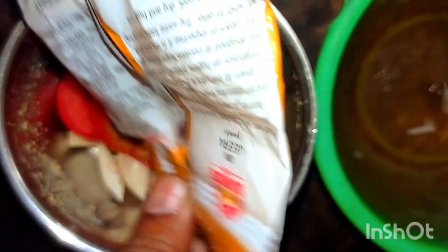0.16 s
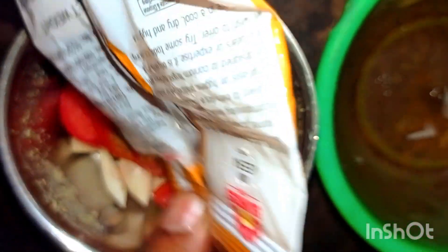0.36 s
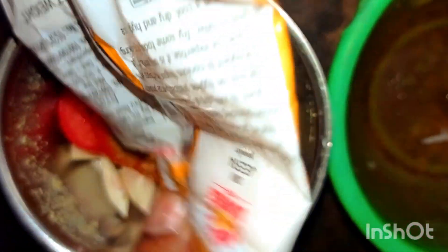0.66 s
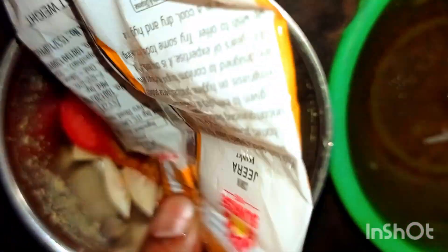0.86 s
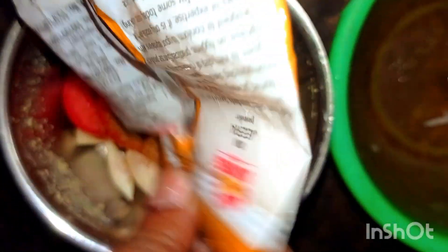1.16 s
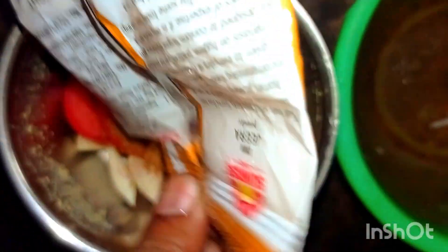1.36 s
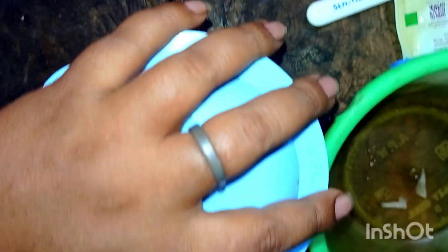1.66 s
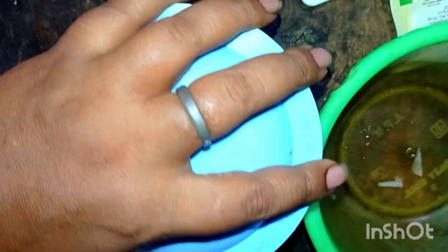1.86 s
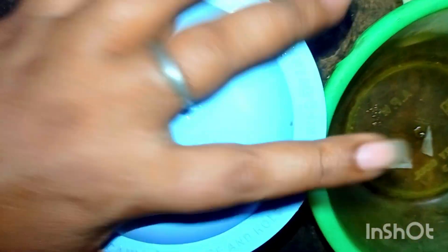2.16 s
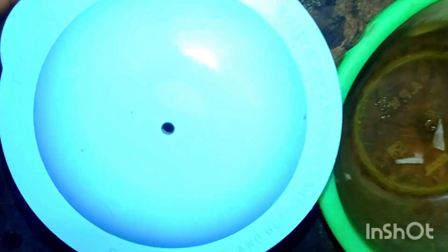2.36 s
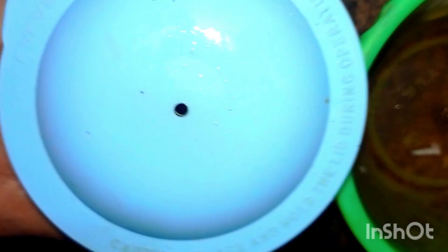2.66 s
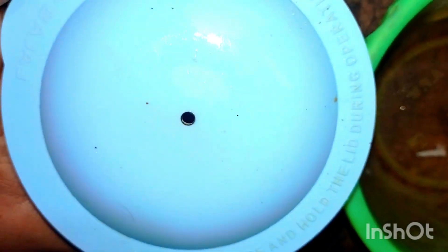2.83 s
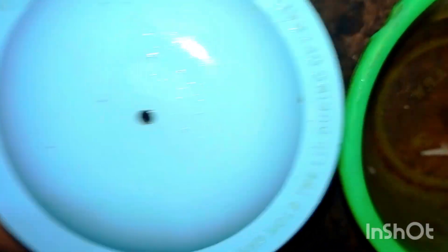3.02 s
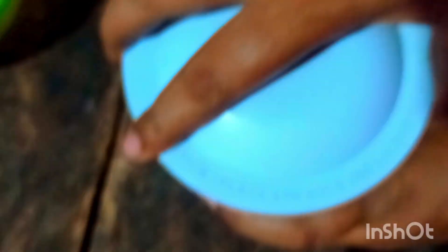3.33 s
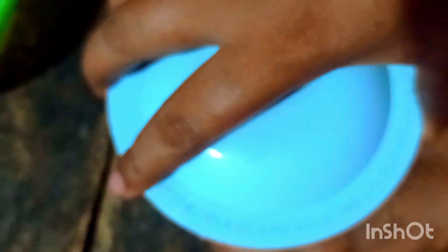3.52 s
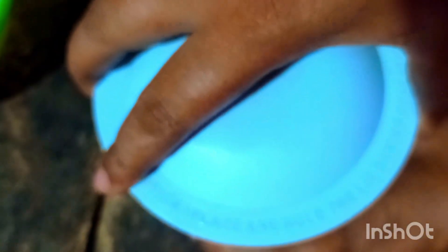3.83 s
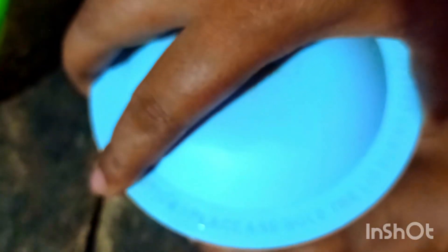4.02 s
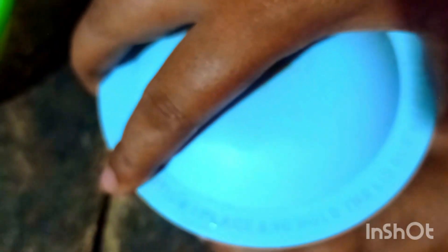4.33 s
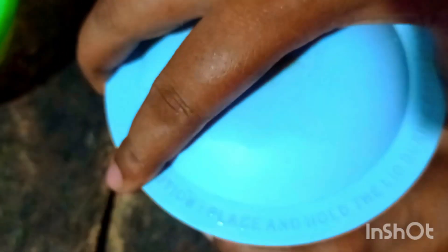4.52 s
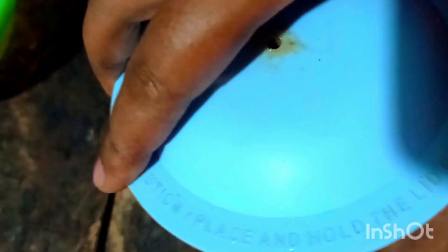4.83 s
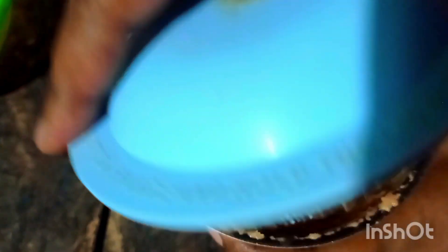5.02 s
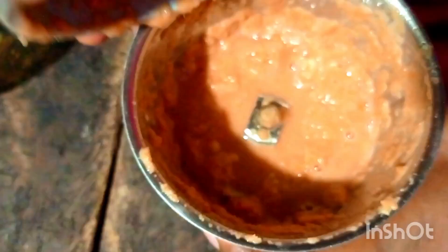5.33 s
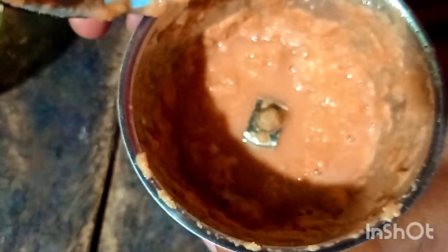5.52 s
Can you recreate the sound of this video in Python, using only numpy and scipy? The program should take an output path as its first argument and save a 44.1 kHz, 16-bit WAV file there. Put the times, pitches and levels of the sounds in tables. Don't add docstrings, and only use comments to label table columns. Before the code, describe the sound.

Close phone pickup of hands at a wooden kitchen table: bright, dry packet crackles come first, dense and uneven. Next, a palm brushes and twists a plastic lid on a metal jar, ending in dull hollow thuds and a thin rising squeak. After a short muted gap, quieter scuffs, faint seal chirps and a rattly knock follow as the lid comes off. Water-like hiss continues throughout except in the gap, slightly softer afterward.

```python
import sys
import numpy as np
from scipy import signal
from scipy.io import wavfile
from scipy.ndimage import uniform_filter1d

SR = 44100
rng = np.random.default_rng(int(sys.argv[2]) if len(sys.argv) > 2 else 0)


def nominal_scale(level):
    x = np.asarray(level, float) / 20
    return 10 ** x


def dump_mix(stems):
    frames = np.atleast_2d(stems).T
    limited = np.clip(frames, -1, 1)
    pcm = np.round(limited * 32767).astype(np.int16)
    wavfile.write(sys.argv[1], SR, pcm)


N = 250620
t = np.arange(N) / SR


def evened(x):
    return x / np.sqrt(np.mean(x ** 2) + 1e-20)


def column(table, index):
    rows = np.array(table)
    return np.interp(t, rows[:, 0], rows[:, index])


def curve(points, hz):
    f, level = np.transpose(points)
    return np.interp(np.log(hz + 1), np.log(f), level, -60, -90)


def add(mix, s, sound):
    part = mix[round(s * SR):][:len(sound)]
    part += sound[:len(part)]


def high_pass(x, hz, order):
    return signal.sosfilt(signal.butter(order, hz, "high", fs=SR, output="sos"), x)


def resonate(x, hz, width_hz):
    turn = np.exp(2j * np.pi * np.cumsum(hz * np.ones(len(x))) / SR)
    r = np.exp(-np.pi * width_hz / SR)
    return 2 * (turn * signal.lfilter([1 - r], [1, -r], x / turn)).real


def body(x, modes):
    return sum(nominal_scale(db) * resonate(x, hz, width) for hz, width, db in modes)


def coloured(points, size, patchy_db, banded_db, high_db=None):
    hop, hz = size // 4, np.fft.rfftfreq(size, 1 / SR)
    a, b, patches, bands = rng.standard_normal((N // hop + 5, len(hz), 4)).T
    patches = evened(uniform_filter1d(uniform_filter1d(patches, size=4, axis=0), size=10, axis=1))
    bands = evened(uniform_filter1d(uniform_filter1d(bands, size=3, axis=0), size=70, axis=1))
    field = curve(points, hz)[:, None] + patchy_db * patches + banded_db * bands
    if high_db is not None:
        frame_at = np.minimum(np.arange(a.shape[1]) * hop, N - 1)
        field += np.clip((hz[:, None] - 8000) / 1500, 0, 1) * high_db[frame_at]
    return signal.istft((a + 1j * b) * nominal_scale(field), nperseg=size, noverlap=size - hop)[1][:N]


def clicks(per_s, spread_db):
    chance, sign, size = rng.random((3, N))
    return evened((chance < per_s / SR) * np.sign(sign - .5) * nominal_scale(-spread_db * np.log(size + 0.012)))


def ring(u, hz, t60, rise):
    return np.sin(2 * np.pi * hz * u) * nominal_scale(-60 * u / t60) * (1 - np.exp(-u / rise))


def tone(hz, width_hz, noise):
    clean = np.sqrt(2) * np.sin(2 * np.pi * np.cumsum(hz * np.ones(len(noise))) / SR)
    return 0.5 * clean + 1.25 * evened(resonate(resonate(noise, hz, width_hz), hz, width_hz))


def swell(peak, rise, fall):
    return nominal_scale(-30 * np.maximum((peak - t) / rise, (t - peak) / fall))


def gliding(rows, sound):
    inside = np.clip(np.minimum(t - rows[0][0], rows[-1][0] - t) / 0.011, 0, 1)
    return inside * nominal_scale(column(rows, index=2)) * sound


# start_s, hiss_db, top_hiss_relative_db, rumble_db, rim_hum_db
SHOT_LEVELS = [
    (0.0, -45, -15.5, -60.5, -74),
    (1.335, -45, -22.5, -70, -71),
    (3.271, -52.5, -19.5, -62.5, -71.5),
]


def shot(index):
    rows = np.array(SHOT_LEVELS)
    return rows[np.clip(np.searchsorted(rows[:, 0], t) - 1, 0, None), index]


# start_s, end_s
SILENCE = (3.045, 3.281)
FADE_IN_S, FADE_FROM_DB = 0.25, -20.5


def fade_in():
    since = np.maximum(t - SILENCE[1], 0)
    return nominal_scale(np.where(t < SILENCE[0], 0, FADE_FROM_DB * np.exp(-3 * since / FADE_IN_S)))


# pitch_hz, density_db (per Hz)
TAP_COLOUR = [(300, -19), (520, -10.5), (900, -17.5), (1400, -16.5), (1950, -9.5), (2600, 0.5), (3200, -2),
              (3800, 0), (4500, -2.5), (6000, -1), (7400, -5), (11500, -9.5), (15700, 2), (16000, -19.5)]
# pitch_hz, density_db (per Hz)
RUMBLE_COLOUR = [(12, -54), (20, -28.5), (81, 3.5), (139, -3.5), (160, -10.5), (198, -7.5), (238, -12.5),
                 (420, -14.5), (600, -48), (780, -45), (1320, -120)]
# time_s, level_db
TAP_FLOW = [
    (0.0, 2.5),
    (.4, -1),
    (.9, -3.5),
    (1.3, -2.5),
    (3.0, -2.5),
    (3.6, -1.5),
    (4.4, 0.5),
    (5.68, 0),
]
# pitch_hz, width_hz, share (0-1)
CUPPED_HANDS = [
    (2000, 630, 0.48),
    (3140, 280, 0.76),
    (5300, 1600, 0.46),
    (2390, 210, 0.53),
    (3700, 90, 0.17),
]
# peak_s, rise_s, fall_s, level_db
TABLE_LEANS = [(.5, 0.27, 0.21, -61), (.82, 0.64, 1, -59.5), (1.17, 0.15, 1, -60.5),
               (1.4, 0.14, 0.042, -68), (1.79, 0.5, 0.63, -52), (2.21, 0.068, 0.18, -39),
               (2.621, 0.065, 0.16, -35.5), (3.03, 0.053, 0.12, -62), (3.96, 0.16, 0.21, -59),
               (4.25, 0.074, 0.26, -66), (4.569, 0.067, 0.065, -44), (4.8, 0.2, 0.22, -44),
               (5.42, 0.55, 0.19, -55.5)]


def kitchen():
    hiss = evened(coloured(TAP_COLOUR, size=512, patchy_db=2.0, banded_db=1.6, high_db=shot(index=2) + 23.5))
    shaded = sum(np.clip(share, 0, 1) * resonate(hiss, hz, width) for hz, width, share in CUPPED_HANDS)
    hiss = hiss - (t > SILENCE[1]) * shaded
    hiss_gain = nominal_scale(shot(index=1) + column(TAP_FLOW, index=1) + 2.5)

    rumble = evened(coloured(RUMBLE_COLOUR, size=2048, patchy_db=2.5, banded_db=0))
    leaning = nominal_scale(shot(index=3)) + sum(nominal_scale(db) * swell(*when) for *when, db in TABLE_LEANS)

    early = t < SILENCE[0]
    drone_hz, drone_db = np.where(early, 293, 425), np.where(early, -65, -72)
    drone = nominal_scale(drone_db) * evened(resonate(rng.standard_normal(N), drone_hz, 7))
    drone = drone * (t > SHOT_LEVELS[1][0]) * (early | (t > 3.43))
    return fade_in() * (hiss_gain * hiss + nominal_scale(2.0) * leaning * rumble) + drone


# start_s, peak_db, sheet_pitch_hz, sheet_relative_db, pouch_relative_db
PACKET_SNAPS = [(0.0225, -20.5, 2620, -4.5, -4), (0.0605, -33, 2300, 9, 3.5),
                (0.174, -24.5, 2880, -4.5, -2), (0.1853, -16.5, 3440, -11, -9), (0.223, -30, 2400, 4.5, -3),
                (0.3318, -23, 2150, -9, -1), (0.35, -17.5, 3330, -13.5, -14), (0.3926, -34, 2300, 9, -1),
                (0.4785, -12, 2220, -3.5, -15), (0.4855, -17, 3320, -26, -5),
                (0.532, -9.5, 2300, -6, -18.5), (0.6128, -21, 2904, -5, -10.5), (0.6263, -14, 2240, 1, -15),
                (0.6978, -38, 3076, -14, 11.5), (0.7028, -21, 3030, -8, -12), (0.7118, -22.5, 2420, -9, -4),
                (0.7369, -16, 2460, -8, -8), (0.7916, -22.5, 2800, 4, -14), (0.9533, -19.5, 2730, -.5, -5),
                (0.9715, -24, 2180, -16, -17), (1.0182, -27.5, 2390, -5, -9), (1.1276, -14, 2880, -2, -11),
                (1.1882, -27, 2900, -3.5, 2), (1.299, -13, 3400, -1, -31.5)]
# start_s, peak_db, sheet_pitch_hz, pouch_relative_db
LESSER_CREASES = [(0.033, -28, 2740, 5), (0.1087, -23, 1970, -37), (0.1342, -23, 2570, -9.5),
                  (0.1557, -46, 2150, 10), (0.2642, -23.5, 3000, -15), (0.2892, -22, 2600, -14),
                  (0.4295, -23, 3150, -17), (0.4538, -23, 2620, -12), (0.5259, -33, 2000, 4),
                  (0.5715, -31.5, 2050, 3.5), (0.5922, -29, 3800, -14), (0.633, -32, 3000, 1),
                  (0.6461, -33.5, 3230, -1), (0.6525, -29, 2830, -4), (0.686, -54, 3480, 14),
                  (0.784, -43, 2080, 5), (0.805, -39, 3120, 6.5), (0.8515, -36, 3170, 5),
                  (0.858, -31, 2780, 1), (0.966, -32.5, 3140, -3.5), (1.029, -29, 3130, 2.5),
                  (1.2295, -40.5, 3080, -11.5), (0.003, -33, 2900, -13), (0.17, -40, 2200, 5),
                  (0.3156, -46, 2200, 8), (0.4695, -41, 2600, 8.5), (0.5743, -34, 2800, -2.5),
                  (0.6367, -47, 2200, 0.5), (0.68, -44, 2000, -3), (0.7429, -39, 2600, -11),
                  (0.8475, -42, 2400, 6), (1.0219, -31, 2600, -1), (1.1925, -32.5, 2500, 6.5),
                  (1.1955, -44, 2600, -5), (1.1317, -29.5, 2900, -15.5), (1.3018, -25, 2900, -14)]
# pitch_hz, width_hz, level_db
POUCH_MODES = [
    (620, 200, -3),
    (880, 110, 5),
    (1060, 130, 4),
    (1390, 3800, -14),
]
BURST_MS, MS_PER_POUCH_DB = 1.35, .025
LESSER_SHEET_DB = -5.5
KICK = 3.02


def snaps():
    out, u = np.zeros(N), np.arange(1024) / SR
    rows = PACKET_SNAPS + [(s, db, hz, LESSER_SHEET_DB, pouch_db) for s, db, hz, pouch_db in LESSER_CREASES]
    for s, db, sheet_hz, sheet_db, pouch_db in rows:
        z = rng.standard_normal(1024)
        burst_ms = np.clip(BURST_MS + MS_PER_POUCH_DB * pouch_db, .7, 3)
        burst = z * u * np.exp(-u * 1300 / burst_ms)
        burst[12] += KICK * np.clip(-pouch_db / 16, 0, 1) * abs(burst).max()
        squeeze = 1.16 ** np.tanh(z[0])
        film = resonate(resonate(burst, 6480, 2500), 3700, 4500)
        sheet = resonate(resonate(burst, sheet_hz, 1300), 1.1 * sheet_hz, 1800)
        film, sheet = high_pass(np.array([film, sheet]), 1850, order=4)
        pouch = resonate(body(burst, np.array(POUCH_MODES) * [squeeze, 1.5, 1]), 950, 800)
        gains = nominal_scale(db + np.array([.1, sheet_db - 2.2, pouch_db - 2.5]))
        add(out, s - .0006, sum(g * p / abs(p).max() for g, p in zip(gains, [film, sheet, pouch])))
    return out


# start_s, peak_db
CREASE_TICKS = [(0.0248, -38.5), (0.1076, -39), (0.183, -50), (0.2372, -38), (0.3481, -44.5), (0.4244, -45),
                (0.478, -21), (0.5307, -34.5), (0.611, -39.5), (0.6242, -17.5), (0.7008, -38),
                (0.7374, -32), (0.791, -29), (0.9526, -34.5), (1.1263, -42.5), (1.1877, -66.5),
                (1.2977, -39)]


def crease_ticks():
    out, u = np.zeros(N), np.arange(1024) / SR
    for s, db in CREASE_TICKS:
        tick = high_pass(rng.standard_normal(1024) * u * np.exp(-u / 0.0006), 11000, order=4)
        tick = tick + 2.3 * resonate(tick, 15600, 1800)
        add(out, s + .0008, nominal_scale(db + 30) * tick / abs(tick).max())
    return out


# time_s, level_db
FILM_FLEX = [
    (0.0, -62.5),
    (0.328, -57.5),
    (0.64, -58.5),
    (0.74, -58.5),
    (0.944, -71.5),
    (1.17, -59.5),
    (1.262, -81),
    (1.33, -59.5),
]


def rustle():
    fine = clicks(per_s=1300, spread_db=5.5)
    pouch = 0.8 * evened(body(fine, POUCH_MODES))
    squeezed = 1.3 * (abs(t - .58) < .26) * evened(resonate(fine, 430, 300))
    sheet = 2.2 * evened(resonate(fine, 2200, 1500) + 0.59 * resonate(fine, 6200, 3500))
    return nominal_scale(column(FILM_FLEX, index=1)) * (t < FILM_FLEX[-1][0]) * (pouch + squeezed + sheet)


def packet():
    return high_pass(snaps() + crease_ticks() + rustle(), 350, order=2)


# start_s, peak_db, t60_s
DUST_PUFFS = [(0.01, -38, 0.45), (0.24, -29.5, 0.4), (0.485, -30, .2), (0.63, -29.5, 0.22),
              (1.135, -40.5, .15), (1.338, -36, .03), (1.437, -26.5, 0.12), (1.7968, -31.5, 0.39),
              (1.838, -25, 0.056), (2.0308, -40, 0.18), (2.1866, -22, 0.11), (2.297, -31, 0.055),
              (2.43, -27.5, 0.096), (2.5162, -33, 0.26), (2.6582, -33.5, 0.12), (3.3942, -40, 0.11),
              (3.9894, -42.5, 0.33), (4.4957, -33, 0.05), (4.7496, -40, 0.18), (4.9207, -32.5, 0.041),
              (4.997, -33, 0.05), (5.0823, -45, 0.22), (5.1377, -39, 0.14), (5.3103, -51, 0.2),
              (5.4081, -34, 0.065), (5.5243, -46, 0.13)]


def puffs():
    out, u = np.zeros(N), np.arange(8000) / SR
    band = signal.butter(4, [8000, 15900], "band", fs=SR, output="sos")
    bright = evened(signal.sosfilt(band, rng.standard_normal(N)))
    bright = 0.6 * bright + 3.0 * resonate(bright, 15100, 1200)
    for s, db, t60 in DUST_PUFFS:
        z = bright[round(s * SR):][:len(u)]
        v = u[:len(z)]
        add(out, s, nominal_scale(db - 5.5 - 60 * v / t60) * (1 - np.exp(-v / 0.0028)) * z)
    return out


# start_s, peak_db, pitch_hz, t60_s
STRUCK_NOTES = [(1.7835, -38, 500, .05), (1.8375, -24, 200, .045), (1.838, -36, 1250, .03),
                (1.847, -34, 950, .03), (1.822, -44, 1300, .05), (1.853, -40, 200, .08),
                (1.871, -38, 190, .08), (2.1838, -15, 165, .055), (2.182, -20, 880, .035),
                (2.199, -21, 145, .09), (2.2255, -26, 145, .07), (2.24, -21, 143, .14),
                (2.184, -36, 1450, .03), (2.593, -32, 140, .12), (2.627, -31, 860, .03),
                (2.628, -27, 170, .14), (2.682, -40, 290, .08), (4.7485, -26, 1300, .025),
                (4.7485, -32, 1600, .02), (4.749, -25, 2480, .015), (4.719, -48, 1080, .08),
                (4.8345, -23, 141, .15), (4.813, -42, 820, .08), (4.872, -50, 1080, .1),
                (4.9965, -39, 2120, .018), (0.7365, -27, 520, .03), (0.3925, -35, 520, .025),
                (0.453, -37, 400, .03), (0.7115, -35, 560, .03), (0.849, -39, 600, .03),
                (1.8385, -30, 3800, .012), (2.6305, -33, 520, .04), (2.645, -36, 560, .08),
                (2.192, -27, 480, .04), (2.205, -37, 780, .06), (4.766, -30, 450, .05),
                (0.7372, -19, 6700, .012), (1.1278, -20, 6800, .01), (1.2987, -15, 7000, .008),
                (1.3015, -26, 7000, .008), (0.5318, -16, 6600, .008), (0.7025, -27, 6500, .01),
                (0.7115, -26, 6300, .012), (1.2988, -29, 1000, .025), (1.3095, -34, 3200, .03),
                (1.3095, -38, 950, .03), (0.7925, -32, 1050, .04), (2.44, -42, 3100, .06),
                (2.19, -30, 9400, .03), (2.19, -30, 6900, .04)]


def struck_notes():
    out, u = np.zeros(N), np.arange(8000) / SR
    for s, db, hz, t60 in STRUCK_NOTES:
        add(out, s, -nominal_scale(db) * ring(u, hz, t60, 0.4 / hz))
    return out


# time_s, pitch_hz, level_db
TABLE_BUZZ = [
    (0.43, 123, -55),
    (0.488, 123, -50),
    (0.6, 125, -54),
    (0.63, 125, -62),
]


def table_buzz():
    return gliding(TABLE_BUZZ, tone(column(TABLE_BUZZ, index=1), 14, rng.standard_normal(N)))


# peak_s, rise_s, fall_s, level_db, rim_relative_db
LID_RUBS = [(1.499, 0.25, 0.26, -52.5, -34), (1.66, 0.073, 0.18, -59.5, -6),
            (1.835, 0.059, 0.082, -38.5, -7), (2.08, 0.51, .12, -82, 13), (2.19, 0.077, 0.2, -43.5, -15),
            (2.63, 0.13, 0.16, -50, -27), (2.86, 0.13, 0.24, -60.5, -18), (3.31, 0.1, 0.39, -75.5, -14),
            (3.46, .05, 0.985, -64.5, -33), (3.845, 0.0086, 0.17, -42, -4), (3.869, 0.034, 0.09, -45, -21),
            (3.895, 0.028, 0.2, -49.5, -16), (3.93, 0.02, 0.1, -56, 5.5), (4.561, 0.0089, 0.35, -51.5, -10),
            (4.601, 0.073, 0.095, -42.5, -26), (4.82, 0.015, 0.11, -46, -6.5), (5.07, 0.3, 0.25, -71, -9),
            (5.28, 0.15, 0.12, -48.5, -5), (5.601, 0.18, .3, -63, -37)]
# pitch_hz, width_hz, level_db
RIM_MODES = [
    (1065, 70, 14),
    (1591, 20, 8),
    (2150, 320, -2),
    (2610, 430, -9),
]
LID_HZ, PRESS_HZ = 313, 90


def rubs():
    slips = clicks(per_s=6000, spread_db=1.5)
    strokes = [swell(*row[:3]) for row in LID_RUBS]
    hz = LID_HZ + PRESS_HZ * np.max(strokes, axis=0) ** 0.2
    lid = resonate(resonate(slips, hz, 110), hz, 520)
    lid = evened(lid + 0.15 * resonate(slips, 1.3 * hz, 300) + 2.0 * resonate(slips, 294.4, 36))
    rim = evened(high_pass(body(slips, RIM_MODES), 800, order=2))
    grit = evened(resonate(resonate(slips, 550, 620), 670, 910) + 0.14 * resonate(slips, 2700, 2000))
    drags = np.zeros(N)
    for stroke, (*_, db, rim_db) in zip(strokes, LID_RUBS):
        drags += stroke * nominal_scale(db) * (lid + nominal_scale(rim_db) * rim + nominal_scale(-10.5) * grit)
    return drags + fade_in() * nominal_scale(shot(index=4)) * rim


# start_s, peak_s, end_s, pitch_hz, level_db
TWIST_NOTES = [(1.384, 1.392, 1.47, 430, -46), (1.44, 1.505, 1.52, 550, -47), (1.53, 1.56, 1.58, 560, -52),
               (1.4, 1.45, 1.47, 2180, -57), (1.5, 1.53, 1.56, 700, -54), (1.43, 1.447, 1.47, 1090, -57),
               (1.55, 1.59, 1.63, 660, -60), (4.225, 4.25, 4.4, 1090, -62), (3.4, 3.51, 3.65, 1075, -65),
               (5.195, 5.205, 5.3, 1080, -58), (5.12, 5.135, 5.18, 1050, -63),
               (5.36, 5.41, 5.45, 1100, -62), (5.35, 5.38, 5.42, 100, -51), (5.41, 5.44, 5.49, 125, -50),
               (1.7, 1.93, 2.0, 175, -54), (3.97, 3.99, 4.04, 1080, -61), (3.85, 3.875, 3.91, 490, -46),
               (4.56, 4.595, 4.63, 470, -48), (2.3, 2.33, 2.38, 150, -48)]


def twist():
    out, noise = np.zeros(N), rng.standard_normal(N)
    for start, peak, end, hz, db in TWIST_NOTES:
        span = slice(round(start * SR), round(end * SR))
        shape = np.interp(t[span], [start, peak, end], [0, 1, 0])
        out[span] += nominal_scale(db) * shape * tone(hz, min(65, hz / 6), noise[span])
    return out


# time_s, pitch_hz, level_db
SKIN_SQUEAKS = [
    [(1.66, 5400, -52), (1.72, 5900, -50), (1.78, 6200, -52)],
    [(2.91, 5000, -52), (2.975, 5200, -51), (2.995, 5500, -54), (3.015, 5650, -56)],
]
SQUEAK_WIDTHS = (900, 120)


def squeaks():
    out, noise = np.zeros(N), rng.standard_normal(N)
    for rows, width_hz in zip(SKIN_SQUEAKS, SQUEAK_WIDTHS):
        hz = column(rows, index=1)
        if width_hz < 200:
            squeak = tone(hz, width_hz, noise)
        else:
            squeak = evened(resonate(resonate(noise, hz, width_hz), hz, width_hz))
        out += gliding(rows, squeak)
    return out


# start_s, peak_db, lid_pitch_hz, jar_relative_db, rattle_relative_db
LID_KNOCKS = [(1.7738, -23.5, 530, -30, -30), (1.8378, -24, 600, -20, 4), (1.8462, -24, 620, -18, -6),
              (2.1815, -10.5, 518, -25, -47), (2.189, -27.5, 880, -15, 9.5), (2.2, -28, 285, -15, -3),
              (2.238, -36, 414, -10, -28), (2.626, -26, 290, -12, -34), (2.6258, -23, 450, -20, -30),
              (2.639, -32, 430, -2, -26), (2.65, -35, 263.5, -14, -32), (4.747, -26, 610, 0.5, -3),
              (4.7488, -23, 2890, -29, 2), (4.7575, -17.5, 286, -26, -33), (4.766, -27, 407, -23, -23),
              (4.811, -18.5, 275, -8, -22), (2.595, -56, 287, 2.5, -26), (4.821, -27, 204.5, -4, -27),
              (4.836, -33, 280, -25, -25)]
JAR_HZ, JAR_LIGHT_HZ, HEAVY_DB = 142.7, 171.5, -22


def knocks():
    out, u = np.zeros(N), np.arange(8000) / SR
    for s, db, lid_hz, jar_db, rattle_db in LID_KNOCKS:
        z, heavy = rng.standard_normal(8000), db > HEAVY_DB
        lid = ring(u, lid_hz, 0.012 + 12 / lid_hz, 0.001)
        lid += 0.22 * heavy * ring(u, 1.75 * lid_hz, 25 / lid_hz, 0.00032)
        jar = ring(u, JAR_HZ if heavy else JAR_LIGHT_HZ, 0.13, 0.002)
        wobble = nominal_scale(-23) * evened(resonate(resonate(z, 265, 500), 490, 710))
        wobble = wobble * nominal_scale(-60 * u / 0.14) * (1 - np.exp(-u / 0.00066))
        rattle = 0.19 * evened(resonate(z, 2140, 1600) + 0.23 * resonate(z, 5700, 1700))
        rattle = rattle * (nominal_scale(-60 * u / 0.031) + 0.27 * nominal_scale(-60 * u / 0.23))
        add(out, s, nominal_scale(db) * (wobble - lid - nominal_scale(jar_db) * jar + nominal_scale(rattle_db) * rattle))
    return out


# start_s, peak_s, end_s, level_db, centre_hz
PALM_BRUSHES = [(1.786, 1.837, 1.836, -35, 5600), (1.835, 1.836, 1.885, -39, 3970),
                (1.95, 2.123, 2.11, -48.5, 2370), (2.188, 2.193, 2.173, -31.5, 4530),
                (3.836, 3.847, 3.3, -65, 2800), (3.92, 3.943, 3.99, -51.5, 3500),
                (4.215, 4.238, 4.33, -53, 2950), (4.68, 4.718, 5.03, -56.5, 2595),
                (5.53, 5.6, 5.7, -58, 2900), (5.136, 5.167, 5.6, -60, 2740), (5.387, 5.41, 5.43, -60, 6000),
                (3.696, 3.744, 3.6, -54, 3900)]


def brushes():
    out, noise = np.zeros(N), rng.standard_normal(N)
    for start, peak, end, db, hz in PALM_BRUSHES:
        if end <= start:
            continue
        span = slice(round(start * SR), round(end * SR))
        dull = evened(resonate(resonate(noise[span], hz, 0.45 * hz), hz, 1.7 * hz))
        out[span] += nominal_scale(db) * np.interp(t[span], [start, peak, end], [0, 1, 0]) * dull
    return out


# start_s, peak_db, pitch_hz, t60_s, opening_tick_relative_db
SEAL_CHIRPS = [(2.1165, -34, 6140, 0.04, 1), (2.3, -45, 2870, 0.1, -4), (2.714, -31, 6500, 0.18, -21),
               (3.712, -33, 5700, 0.16, -17), (3.93, -42, 6300, 0.18, -4), (4.234, -45.5, 4100, 0.16, 5),
               (4.497, -48.5, 4000, .1, -2), (4, -52, 4020, 0.1, 3), (4.718, -33, 3300, 0.093, -35),
               (4.732, -31, 3030, 0.069, -35), (4.72, -39, 6100, 0.11, -30), (4.34, -42, 4500, 0.15, -30),
               (4.662, -42, 5900, 0.12, -30), (4.53, -45, 3800, 0.15, -10), (2.188, -35.5, 8500, .06, -30),
               (4.915, -36, 3760, 0.16, -15), (4.997, -42, 2150, 0.075, 7)]


def chirps():
    out, u = np.zeros(N), np.arange(8000) / SR
    for s, db, hz, t60, tick_db in SEAL_CHIRPS:
        z = rng.standard_normal(len(u))
        glide = hz * (1 + 0.017 * np.exp(-u / 0.0072))
        fuzz = 0.38 * evened(resonate(resonate(z, glide, 600), glide, 1000))
        fuzz = fuzz * nominal_scale(-60 * u / t60) * (1 - np.exp(-u / 0.0019))
        tick = resonate(resonate(resonate(z, 6200, 5200), 4900, 4650), 4300, 4660) * np.exp(-u / 0.0029)
        add(out, s, nominal_scale(db) * (fuzz + nominal_scale(tick_db) * tick))
    return out


def room(x):
    u, at = np.arange(12000) / SR, np.arange(100, 11900, 22)
    taps = np.zeros(len(u))
    taps[at + rng.integers(0, 22, len(at))] = rng.choice([-1., 1.], len(at))
    tail = taps * (nominal_scale(-60 * u / 0.022) + nominal_scale(-12 - 60 * u / 0.2))
    tail = nominal_scale(-12.0) * tail / np.linalg.norm(tail)
    tail[round(.0028 * SR)] += nominal_scale(-13)
    return x + signal.oaconvolve(x, tail)[:N]


def scene():
    echoing = room(packet() + struck_notes() + knocks())
    hands = puffs() + table_buzz() + rubs() + twist() + squeaks() + brushes() + chirps()
    return (kitchen() + echoing + hands)[None]


# pitch_hz, level_db
MIC_RESPONSE = [(20, -17.5), (60, -9.5), (120, -2), (7300, 2.5), (8200, -7), (10500, -15.5), (12000, -28.5),
                (13500, -32), (14600, -32.5), (15600, -26.5), (16600, -39.5), (17200, -60)]


def microphone(dry):
    gain = np.log(nominal_scale(curve(MIC_RESPONSE, abs(np.fft.fftfreq(8192, 1 / SR)))))
    taps = np.fft.ifft(np.exp(gain - 1j * signal.hilbert(gain).imag)).real[:4096]
    heard = signal.oaconvolve(dry, taps[None])[:, :N]
    return .8 * np.tanh(heard / .8)


def top_cut(x):
    return signal.sosfilt(signal.butter(12, 17140, fs=SR, output="sos"), x)


def record(dry):
    unmuted = np.clip(np.maximum(SILENCE[0] - t, t - SILENCE[1]) / 0.0037, 0, 1)
    return top_cut(microphone(dry) * unmuted)


dry = scene()
out = record(dry)
dump_mix(out)
```